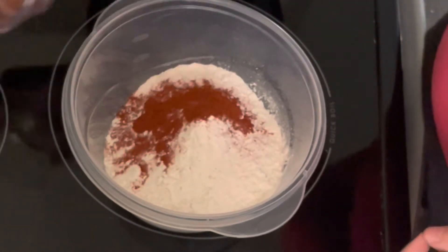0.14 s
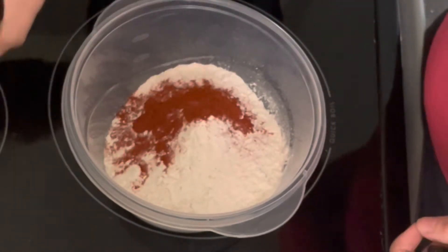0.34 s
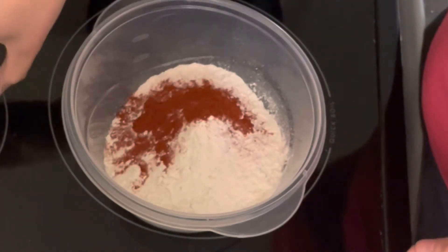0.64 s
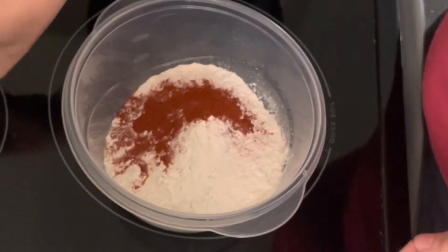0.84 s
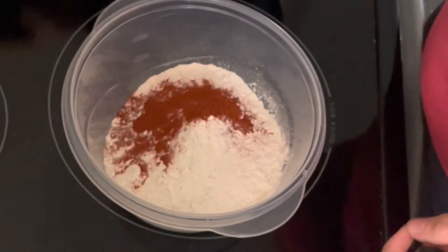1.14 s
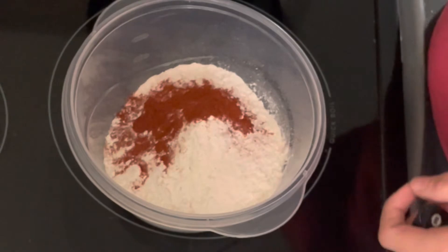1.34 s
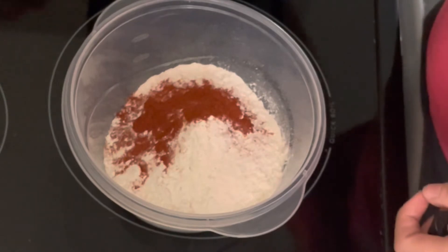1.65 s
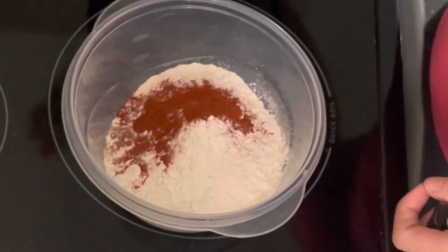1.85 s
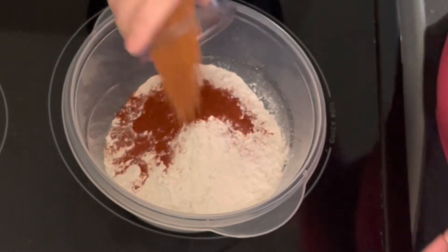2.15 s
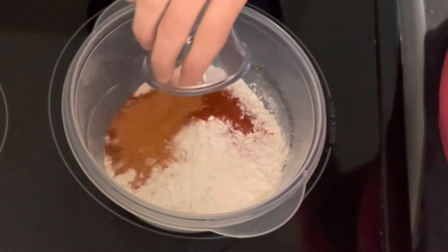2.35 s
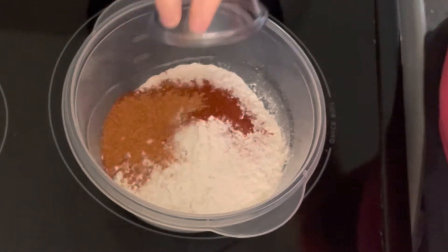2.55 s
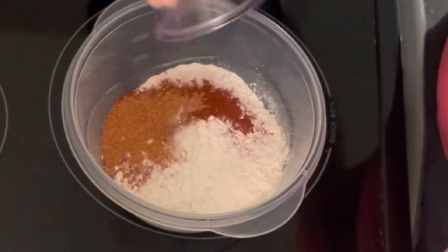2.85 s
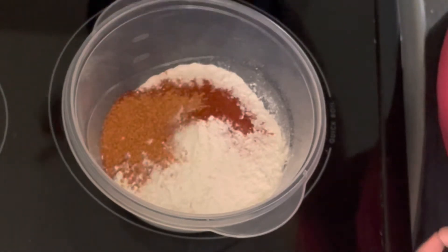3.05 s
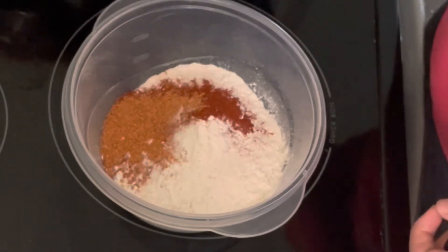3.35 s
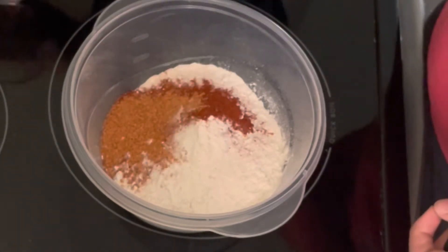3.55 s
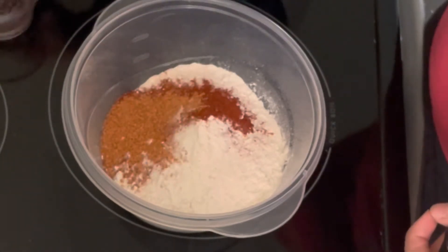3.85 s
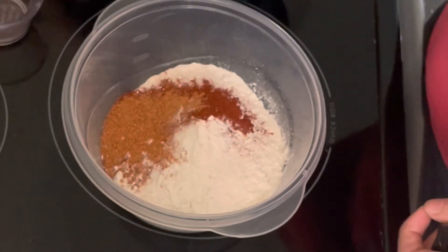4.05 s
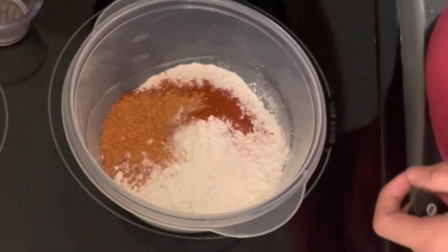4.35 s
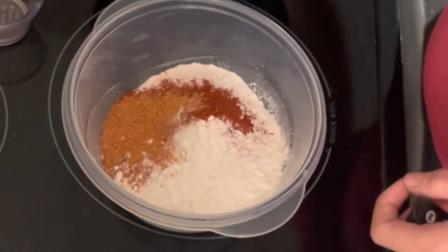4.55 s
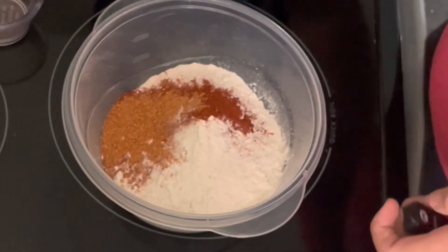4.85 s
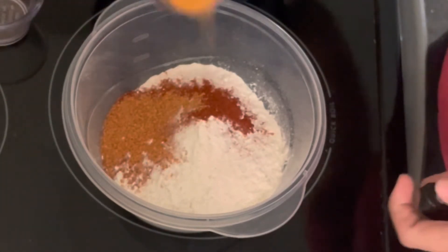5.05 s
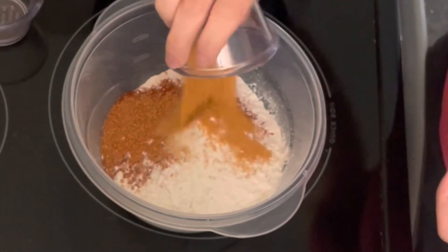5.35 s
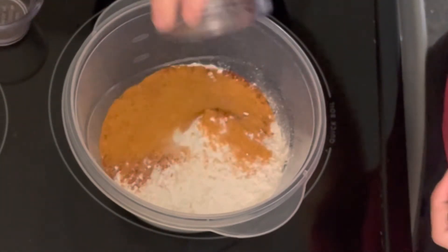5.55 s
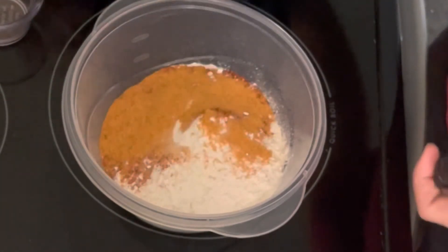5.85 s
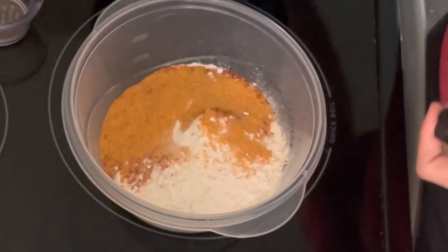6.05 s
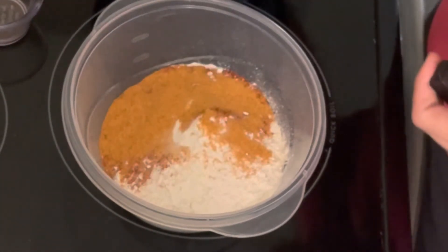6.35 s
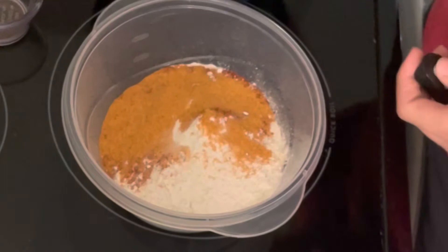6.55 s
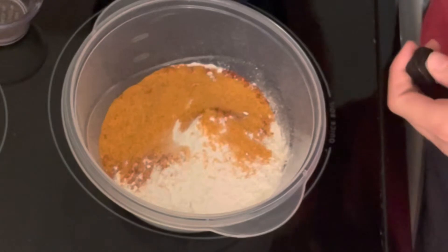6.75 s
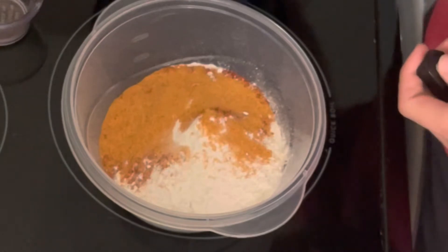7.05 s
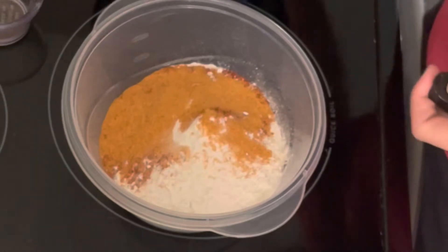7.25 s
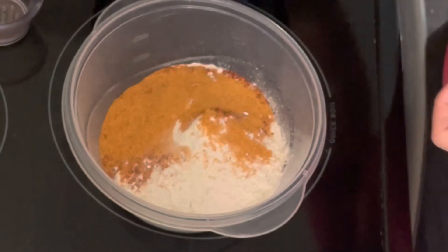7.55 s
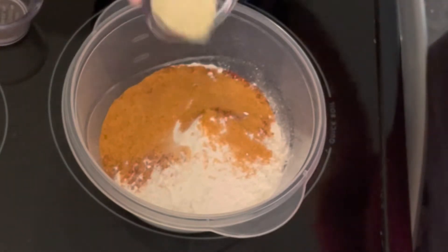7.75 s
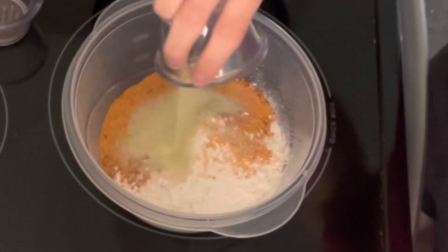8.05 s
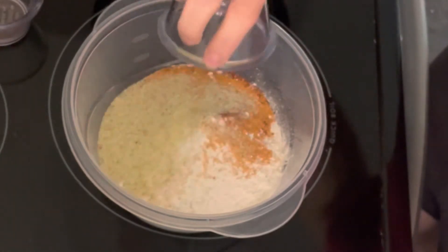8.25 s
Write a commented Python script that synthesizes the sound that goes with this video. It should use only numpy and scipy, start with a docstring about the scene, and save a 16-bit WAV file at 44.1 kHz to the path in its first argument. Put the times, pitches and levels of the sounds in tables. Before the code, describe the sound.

In a quiet kitchen, emptied glass cups wobble ever faster on a hard glass hob, between soft spice pours and a hollow stove thump.

```python
"""In a small kitchen with a low appliance hum, ground spices hiss from small glass cups into a bowl of flour.
Three emptied cups are put down on the glass hob and rock on their rims ever faster until they settle.
Hands bump the stove, fingers tick on the glass, the worktop is scuffed and a faint treble hiss comes and goes.
Hits are filtered noise bursts and decaying sines; sliding and pouring are grainy noise under rising and
falling levels; the room is shaped noise with wavering hum tones."""
import sys
import numpy as np
from scipy import signal
from scipy.fft import rfft, irfft
from scipy.io import wavfile

SR = 44100
rng = np.random.default_rng(int(sys.argv[2]) if len(sys.argv) > 2 else 0)


def master(y):
    """Save y as 16-bit WAV."""
    cut = np.clip(np.atleast_2d(y).T, -1, 1)
    pcm = np.round(cut * 32767)  # scale
    wavfile.write(sys.argv[1], SR, pcm.astype(np.int16))


N = 371013
TIME = np.arange(N) / SR
HIT_TIME = TIME[:int(.55 * SR)]  # time axis of a single hit, s
ROOM_T60_S = 0.5918


# A tilted cup's rim strikes the hob. Each row: time in seconds, relative level in dB,
# hardness as treble share in dB, weight as bass share in dB.
RIM_KNOCKS = [(0.7277, -17, -16.5, -1), (0.835, -25.5, -26, -12), (0.913, -21, -18.5, -30),
              (0.9209, -21.5, -15, -34), (0.993, -19, -15, -22.5), (1.05, -23, -23, -19),
              (1.115, -24.5, -25, -24), (1.173, -22.5, -21, -37), (1.226, -21, -22, -39.5),
              (1.288, -17, -12, -31), (1.344, -19.5, -13, -24), (1.387, -24.5, -26, -35.5),
              (1.441, -29.5, -28, -29), (1.477, -23.5, -23, -31.5), (1.524, -24.5, -25, -24),
              (1.562, -21, -15.5, -30.5), (1.603, -22, -20.5, -26), (3.6728, -11, -13, -20.5),
              (3.677, -16, -10, -9), (3.863, -23.5, -19, -29), (3.877, -19.5, -9.5, -22),
              (3.902, -22, -14, -12.5), (3.943, -18.5, -6.5, -11), (3.969, -21, -14, -18.5),
              (6.4243, -19, -16, -17), (6.577, -24.5, -20, -26), (6.635, -15, -10.5, -25.5),
              (6.684, -18, -12, -15), (6.731, -25, -16.5, -18.5), (6.765, -20, -16, -32.5),
              (6.805, -29, -26.5, -19), (6.836, -22, -16, -24), (6.875, -18, -10.5, -21.5)]
# Times in seconds at which the next cup takes over.
CUP_CHANGES = [3, 6]
# Each cup then shivers to rest. Each row: start in seconds, stop in seconds, first gap in seconds,
# ratio of each gap to the last, relative level in dB, hardness in dB, weight in dB.
SHIVERS = [(1.634, 1.858, .032, 0.94, -25, -19.5, -22), (3.998, 4.096, .025, .85, -25.5, -15, -14),
           (6.908, 6.994, .03, .86, -19.5, -13, -22)]
# Tone of each cup on its own spot of the hob. Each row: frequency in Hz, relative level in dB.
FIRST_CUP_TONE = [(65, -47.5), (110, -19), (214, -7.5), (525, -11), (571, -6.5), (733, -6), (1160, -1.5),
                  (1430, -3), (2260, -8), (3500, -16), (4880, -27.5), (6950, -30.5), (7560, -54.5),
                  (12200, -63.5), (16000, -79)]
SECOND_CUP_TONE = [(65, -34), (110, -11), (181, 1), (299, -5.5), (595, -0.5), (848, -7.5), (1160, -4.5),
                   (1430, -3), (1830, -1.5), (4400, -15), (4780, -23.5), (6950, -21), (7720, -50),
                   (13000, -62), (16000, -52.5)]
THIRD_CUP_TONE = [(65, -31.5), (110, -12), (201, -0.5), (293, -5.5), (473, -1), (559, -5.5), (780, -2),
                  (1550, -10), (1870, -6.5), (3280, -7.5), (5760, -22), (6810, -13.5), (9500, -49),
                  (12500, -54), (16000, -52)]
# Resonances of each cup with the hob under it. Each row: frequency in Hz, width in Hz, relative level in dB.
FIRST_CUP_RESONANCES = [(371.5, 53, -6.5), (590, 32, -8), (991, 18, 3), (1168, 81, -11), (1773, 29, 2),
                        (2282, 100, -2.5), (2664, 82, -7.5), (2737, 46, -7.5), (3200, 51, -9.5),
                        (3856, 83, -19), (4400, 41, -22.5)]
SECOND_CUP_RESONANCES = [(360, 70, -2), (593, 73, -8.5), (797, 27, 1), (982, 130, -0.5),
                         (1219.4, 230, -7.5), (1778, 227, -1.5), (2574, 59, -4.5), (2780, 47, -8.5),
                         (3346, 42, -3.5), (3590, 37, -11.5), (4182, 33, -5)]
THIRD_CUP_RESONANCES = [(434, 290, -17.5), (742, 120, -25), (1190, 530, 0), (1820, 370, 9), (2370, 86, -7),
                        (2876, 110, -4), (3323, 57, -8), (3670, 140, -8), (3980, 60, -23.5), (4770, 21, -5)]


def rocking_cups():
    """Three cups, one after the other: a few separate knocks, then the shiver to rest."""
    all_knocks = np.array(RIM_KNOCKS)
    knocks_by_cup = np.split(all_knocks, np.searchsorted(all_knocks[:, 0], CUP_CHANGES))
    cups = [(FIRST_CUP_TONE, FIRST_CUP_RESONANCES), (SECOND_CUP_TONE, SECOND_CUP_RESONANCES),
            (THIRD_CUP_TONE, THIRD_CUP_RESONANCES)]
    out = np.zeros((2, N))
    for knocks, shiver, (tone, rings) in zip(knocks_by_cup, SHIVERS, cups):
        out += rocking_cup(list(knocks) + settling(*shiver), tone, rings)
    return out


def settling(start_s, stop_s, gap_s, ratio, db, treble_db, bass_db, count=14):
    """Like a spun coin, the cup strikes after ever shorter gaps, with more bass as it comes flat."""
    gaps = gap_s * ratio ** np.arange(count)
    times = start_s + np.cumsum(gaps) - gaps
    flatness = (times - start_s) / (stop_s - start_s) - .5
    chance = rng.standard_normal((count, 2))
    knocks = []
    for s, flat, (force, edge) in zip(times, flatness, chance):
        if s < stop_s:
            knocks.append((s, db + 0.54 * force, treble_db + 2.0 * edge, bass_db + 2.0 * flat))
    return knocks


def rocking_cup(knocks, tone, rings):
    """Each rim contact rings the hob and the cup: hard ones crack brightly, soft ones roll in."""
    knock_db, ring_db = -9.5, -6.0
    usual_treble_db, hardness = -14.5, .7
    usual_bass_db, weight = -19.0, 0.66
    roll_s, alike, linger = 0.00018, .25, .6
    out = np.zeros((2, N))
    spot = struck(t60=0.22, room_db=-13.5)  # the same spot answers every contact partly alike
    for s, db, treble_db, bass_db in knocks:
        bright_db = hardness * (treble_db - usual_treble_db)
        plate = np.sqrt(alike) * spot + np.sqrt(1 - alike) * struck(t60=0.14, room_db=-12.0)
        # the direct snap, then reflections off the bowl and worktop
        crack = noise(len(HIT_TIME)) * (undb(1.5) * fade(0.0039) + fade(0.027))
        plate = plate + undb(bright_db / 2) * colour(crack, [(1500, 0), (6000, 6.0)])
        plate = plate * swell(roll_s * undb(-2 * bright_db))
        # a soft contact rattles on longer
        rebounds = chatter(length_s=.005 * undb(-linger * bright_db), rebound=0.3)
        plate = signal.fftconvolve(plate, rebounds, axes=1)[:, :len(HIT_TIME)]
        contact = [(220, weight * (bass_db - usual_bass_db)), (800, 0), (1500, 0),
                   (2600, 2.5 + 0.97 * bright_db), (5000, bright_db)]
        plate = shape(plate, lambda hz: (curve(tone, hz) + curve(contact, hz)
                                         + hob_resonance(rings, hz) + contact_point(hz)))
        glass = blow(cup_ring(t60=0.049, room_db=-19.5), db + knock_db + treble_db + ring_db)
        add(out, s, blow(plate, db + knock_db) + glass)
    return out


def chatter(length_s, rebound, count=10):
    """A first contact, then scattered rebounds of the rim that weaken with time."""
    force = np.zeros(len(HIT_TIME))
    delay = rng.exponential(1, count)
    index = np.minimum(delay * length_s * SR, len(HIT_TIME) - 1).astype(int)
    force[index] = rebound * rng.standard_normal(count) * np.exp(-delay / 2)
    force[0] = 1
    return force[None]


def hob_resonance(rings, hz, lift_db=8.0):
    """The strongest resonances stand out of the plate's dense modes."""
    softened = [(f, width, .3 * db) for f, width, db in rings]
    return lift_db * np.minimum(resonances(softened, hz), 1.3)


def contact_point(hz, spread_db=1.84, count=24):
    """The contact travels round the rim and favours other resonances, drawn afresh at each blow."""
    centres = np.geomspace(300, 9000, count)
    return curve(np.column_stack([centres, spread_db * rng.standard_normal(count)]), hz)


# Ring of a glass cup. Each row: frequency in Hz, width in Hz, relative level in dB.
GLASS_RINGS = [(1640, 730, -11.5), (4240, 32, 3), (6960, 80, -4.5), (6822, 60, 0.5), (8153, 390, -18),
               (12460, 1600, -20.5)]
# Tone of the glass ring in the mid channel, with a deep dip near 10 kHz. Each row: frequency in Hz, gain in dB.
GLASS_TONE = [(500, -14.5), (1500, 3), (8400, 1), (9800, -31), (12000, -3)]


def cup_ring(t60, room_db):
    """The glass rings in a few bands, smeared by the room."""
    return shape(struck(t60, room_db),
                 lambda hz: 10 * np.log10(resonances(GLASS_RINGS, hz)) + curve(GLASS_TONE, hz))


# Fingers tick on a cup. Each row: time in seconds, relative ring level in dB, relative dull tap level in dB.
FINGER_TICKS = [(0.17, -55, -78.5), (0.49, -66.5, -66.5), (2.8153, -61.5, -63.5), (5.5773, -69.5, -63.5),
                (5.6094, -57.5, -64.5), (5.78, -59.5, -70), (5.812, -62.5, -88.5), (6.034, -60.5, -86.5),
                (6.1251, -66, -89.5), (8.034, -59.5, -62.5)]
# Tone of a finger tick: the ring near 4 kHz is held below the one near 7 kHz.
# Each row: frequency in Hz, gain in dB.
TICK_TONE = [(4000, -6), (7000, 0)]
# Tone of the dull tap. Each row: frequency in Hz, gain in dB.
TAP_TONE = [(700, -14), (1300, 8), (1750, 13), (2400, -14.5), (4000, -35.5), (9000, -24.5)]


def finger_ticks(tick_db=-10.0, click_db=-11.0, tap_db=-7.5):
    """A held cup taps and rings faintly under the fingers: ring, fine click and dull tap together."""
    out = np.zeros((2, N))
    for s, db, dull_db in FINGER_TICKS:
        ring = colour(cup_ring(t60=0.13, room_db=-12.0), TICK_TONE)
        click = colour(struck(t60=0.018, room_db=-33.5), POWDER_TONE)
        tap = colour(struck(t60=0.05, room_db=-19.0), TAP_TONE)
        add(out, s, blow(ring, db + tick_db))
        add(out, s, blow(click, db + tick_db + click_db))
        add(out, s, blow(tap, dull_db + tap_db))
    return out


# Dull bumps against the stove. Each row: time in seconds, relative boom level in dB, relative clack level in dB.
STOVE_BUMPS = [(0.283, -46, -55), (3.36, -18.5, -30.5), (3.366, -12, -38.5), (3.387, -24, -31.5),
               (3.404, -22, -35.5), (3.421, -23.5, -46), (3.499, -29.5, -56.5)]
# The stove's hollow body. Each row: frequency in Hz, relative level in dB, decay time t60 in seconds.
STOVE_MODES = [(73, -20.5, 1), (103.08, -18.5, 0.95), (166.9, -17.5, .35), (204.6, -10, 0.27),
               (238.4, 3, .2), (292, -10, 0.089), (509.3, -7.5, 0.2), (583, -22.5, 0.42),
               (659, -21.5, 0.21), (1064, -32.5, .3)]
# Tone of the boom. Each row: frequency in Hz, gain in dB.
BOOM_TONE = [(41, -49), (70, -25), (178, -8.5), (228, -1.5), (281, -19.5), (329, -15), (397, -24.5),
             (496, -14.5), (774, -39.5), (1000, -34), (1300, -63.5), (2200, -120)]
# Tone of the contact clack. Each row: frequency in Hz, gain in dB.
CLACK_TONE = [(350, -27), (600, 2), (790, -11.5), (2370, -14), (2870, -20), (5950, -28.5), (8050, -33.5),
              (11000, -86), (12700, -39), (14900, -36.5), (16000, -55)]


def bumps(body_db=-14.5, boom_db=-15.5, contact_db=-3.5):
    """A short clack, while the stove's hollow body swells into a longer boom."""
    out = np.zeros((2, N))
    for s, db, clack_db in STOVE_BUMPS:
        body = modes(STOVE_MODES) * swell(0.0048)
        boom = colour(struck(t60=0.11, room_db=-10.5), BOOM_TONE)
        clack = colour(struck(t60=0.09, room_db=-16.5), CLACK_TONE)
        add(out, s, blow(body, db + body_db))
        add(out, s, blow(boom, db + boom_db, count=2400))
        add(out, s, blow(clack, clack_db + contact_db))
    return out


# A hand or cup scuffs the worktop. Each row: time in seconds, relative level in dB,
# relative gritty catch level in dB.
WORKTOP_SCUFFS = [(0.285, -37.5, -104), (0.323, -40.5, -68.5), (3.11, -38.5, -48), (3.124, -34, -43.5),
                  (3.254, -45, -54.5), (3.272, -37.5, -44.5)]
# Tone of the rub. Each row: frequency in Hz, gain in dB.
SCUFF_TONE = [(76, -27.5), (130, 2.5), (198, 1), (522, -8), (796, -21), (898, -21.5), (1140, -22),
              (2890, -24.5), (3460, -36.5), (7750, -42), (9100, -51), (10100, -75), (10900, -52.5),
              (12600, -45.5), (16000, -46)]
# Tone of the gritty catch. Each row: frequency in Hz, gain in dB.
CATCH_TONE = [(880, -49.5), (1500, -16), (2860, -4.5), (3730, -20.5), (6240, -16), (9190, -28.5),
              (10000, -49.5), (12100, -23), (16000, -22.5)]


def scuffs(scuff_db=-10.5, catch_db=-7.5):
    """Brief rubs that catch grittily, swell and die in the room."""
    out = np.zeros((2, N))
    for s, db, grit_db in WORKTOP_SCUFFS:
        rub = colour(struck(t60=0.15, room_db=-8.0) * swell(0.0031), SCUFF_TONE)
        catch = colour(struck(t60=0.071, room_db=-14.0) * swell(.003), CATCH_TONE)
        add(out, s, blow(rub, db + scuff_db) + blow(catch, grit_db + catch_db))
    return out


# Powder slides out of a cup. Each row: start in seconds, relative level in dB.
SPICE_POURS = [(2.33, -82.5), (5.426, -78), (8.109, -70.5)]
# Tone of the powder. Each row: frequency in Hz, gain in dB.
POWDER_TONE = [(880, -46), (1500, -18), (2460, -3), (4830, -7.5), (6960, -4), (8660, -20.5), (9650, -48),
               (12200, -10), (16000, -20.5)]


def pouring_powder(rise_s=0.0327, fall_s=.09):
    """Ground spice slides out of the cup as a brief grainy hiss."""
    strokes = [(s, db, rise_s, fall_s) for s, db in SPICE_POURS]
    return sliding(strokes, POWDER_TONE, gain_db=8.5)


# A cup slides on the hob. Each row: start in seconds, relative level in dB, rise in seconds, fall in seconds.
CUP_SLIDES = [(4.37, -78, 0.065, .12)]


def sliding_cup():
    """A cup slides on the hob with a faint hiss, in the same tone as the powder."""
    return sliding(CUP_SLIDES, POWDER_TONE, gain_db=4.0)


# Faint treble hiss rises and falls, some of it perhaps a sleeve.
# Each row: start in seconds, relative level in dB, rise in seconds, fall in seconds.
HISS_SWELLS = [(0.0, -84, 0.017, .04), (0.11, -86, 0.031, 0.23), (1.9, -70.5, .04, 0.39),
               (4.7, -86, 0.062, 0.21), (4.88, -76, 0.082, 0.1385), (5.14, -81, .12, 0.158),
               (7.5, -86, .02, 0.15), (7.6, -69.5, 0.035, .2), (7.8, -68.5, 0.22, 0.136)]
# Tone of the hiss. Each row: frequency in Hz, gain in dB.
HISS_TONE = [(3000, -11), (5500, -4), (7200, 9.5), (8300, 3.5), (10000, -27.5), (12700, 6.5), (15500, -6)]


def treble_hiss():
    """Faint treble hiss rises and falls in grainy swells, some of it perhaps a sleeve."""
    return sliding(HISS_SWELLS, HISS_TONE, gain_db=1.5)


def sliding(strokes, tone, gain_db, grain_db=1.5, size=60):
    """Tiny grains of uneven level merge into a gritty hiss that rises and falls with each stroke."""
    # one random level for every 60 samples
    grains = undb(grain_db * np.repeat(rng.standard_normal(N // size + 1), size)[:N])
    hiss = colour(noise(N) * grains, tone)
    level = np.zeros(N)
    for s, db, rise, fall in strokes:
        level += np.interp(TIME, [s, s + rise, s + rise + fall], [0, undb(db), 0])
    return hiss / rms(hiss[0]) * level * undb(gain_db)


# Tone of the room air. Each row: frequency in Hz, gain in dB.
ROOM_TONE = [(12, -41), (20, -22), (56, 0.5), (204, -19), (277, -15.5), (446, -22), (485, -26), (542, -29),
             (1570, -41.5), (3340, -55.5), (4180, -52), (5230, -56.5), (6720, -53.5), (9670, -71.5),
             (16000, -50)]
# Side against mid for the room's air. Each row: frequency in Hz, side gain in dB.
ROOM_WIDTH = [(50, -44.5), (130, -14.5), (330, -9.5), (650, 3.5), (1000, 3), (1800, -8.5), (3500, -2.5),
              (7500, -3.5), (10000, 25.5), (12700, 1), (15000, -5.5)]
# Appliance hum. Each row: frequency in Hz, relative level in dB.
HUM_TONES = [(48.4, -58.5), (236.9, -70.5), (285.3, -75.5), (360.7, -75.5), (419.9, -83), (479.1, -74),
             (629.8, -83.5), (721.4, -83.5)]


def kitchen(air_db=-54.5, hum_db=-0.5, waver=0.38, count=40):
    """Low room rumble, and an appliance hum whose tones waver slowly in size and phase."""
    air = colour(noise(N, ROOM_WIDTH), ROOM_TONE)
    air *= undb(air_db) / rms(air[0])
    knots = np.linspace(0, TIME[-1], count)
    for hz, db in HUM_TONES:
        size = np.interp(TIME, knots, waver * rng.standard_normal(count))
        drift = np.interp(TIME, knots, waver * rng.standard_normal(count))  # in cycles
        tone = np.sin(2 * np.pi * (hz * TIME + drift))
        air[0] += np.sqrt(2) * undb(db + hum_db) * (1 + size) * tone
    return air


def struck(t60, room_db):
    """Noise stands for dense plate modes that die quickly, followed by the kitchen's reverberation."""
    room = undb(room_db) * fade(ROOM_T60_S) * swell(0.0054)
    return noise(len(HIT_TIME)) * np.hypot(fade(t60), room)


# Side against mid for near sounds. Each row: frequency in Hz, side gain in dB.
CLOSE_WIDTH = [(100, -31), (430, -20), (620, -5), (1100, -6.5), (1800, -16.5), (2800, -4.5), (4400, -5),
               (5500, -4.5), (7000, -3), (8300, 5), (10000, 28.5), (12700, -3.5), (15000, -2)]


def noise(count, width=CLOSE_WIDTH):
    """Diffuse sound as a mid-side pair, white in the mid."""
    mid, side = rng.standard_normal((2, count))
    return np.array([mid, shape(side, lambda hz: curve(width, hz))])


def modes(table, scatter_db=0.5):
    """Decaying sines, a quarter cycle apart in mid and side, in slightly new proportions at every blow."""
    out = 0
    for hz, db, t60 in table:
        width_db = np.array([[0], [curve(CLOSE_WIDTH, hz)]])
        gain = undb(db + scatter_db * rng.standard_normal() + width_db)
        phase = 2 * np.pi * hz * HIT_TIME
        out = out + gain * fade(t60) * np.array([np.sin(phase), np.cos(phase)])
    return out


def resonances(table, hz):
    """Summed power response of (Hz, width in Hz, dB) resonances."""
    return sum(undb(db) ** 2 / (1 + (2 * (hz - f) / width) ** 2) for f, width, db in table)


def undb(db):
    """Decibels to gain."""
    return 10 ** (np.asarray(db) / 20)


def rms(x):
    """Root mean square."""
    return np.sqrt(np.mean(x ** 2))


def fade(t60):
    """Exponential decay by 60 dB in t60 seconds."""
    return np.exp(-np.log(1000) * HIT_TIME / t60)


def swell(rise_s):
    """Exponential rise from silence with time constant rise_s."""
    return 1 - np.exp(-HIT_TIME / rise_s)


def curve(points, hz):
    """Read (Hz, dB) points on a log-frequency axis."""
    f, db = np.transpose(points)
    return np.interp(np.log(hz + 1), np.log(f), db)


def shape(x, db_at, size=4096):
    """Minimum-phase filter whose gain in dB is the function db_at(Hz)."""
    hz = np.arange(size // 2 + 1) * SR / size
    cepstrum = irfft(np.log(undb(db_at(hz))))
    # folding the cepstrum onto positive time makes the filter causal
    cepstrum[1:size // 2] *= 2
    cepstrum[size // 2 + 1:] = 0
    taps = irfft(np.exp(rfft(cepstrum)))
    return signal.fftconvolve(x, np.array(taps, ndmin=x.ndim), axes=-1)[..., :x.shape[-1]]


def colour(pair, points):
    """Filter a mid-side pair by (Hz, dB) points."""
    return shape(pair, lambda hz: curve(points, hz))


def blow(pair, db, count=800):
    """Set the mid level of a hit's first samples."""
    return pair * undb(db) / rms(pair[0, :count])


def add(out, s, pair):
    """Mix a sound in at time s."""
    start = int(s * SR)
    piece = pair[:, :N - start]
    out[:, start:start + piece.shape[1]] += piece


def scene():
    """All sources, turned from mid and side to left and right."""
    hits = rocking_cups() + finger_ticks() + bumps() + scuffs()
    slides = pouring_powder() + sliding_cup() + treble_hiss()
    mid, side = hits + slides + kitchen()
    return np.array([mid + side, mid - side])


def record(dry, low_cut_hz=30.15, top_hz=15900):
    """A gentle high-pass thins the lowest rumble and a steep low-pass cuts the top."""
    low_cut = signal.butter(2, low_cut_hz, "high", fs=SR, output="sos")
    top_cut = signal.ellip(10, .2, 80, top_hz, fs=SR, output="sos")  # 0.2 dB ripple, 80 dB stop
    thinned = signal.sosfilt(low_cut, dry)
    return signal.sosfilt(top_cut, thinned)


dry = scene()
out = record(dry)
master(out)
```